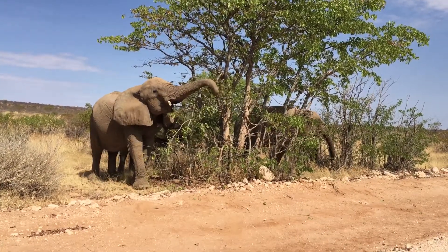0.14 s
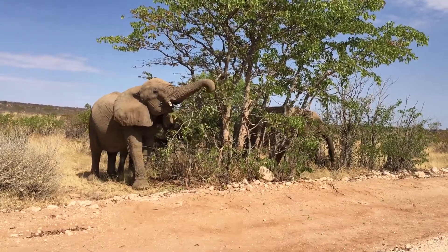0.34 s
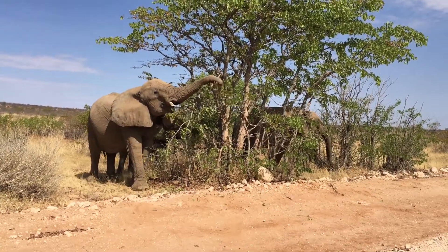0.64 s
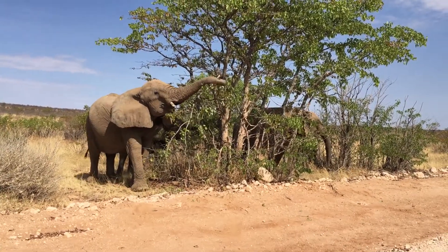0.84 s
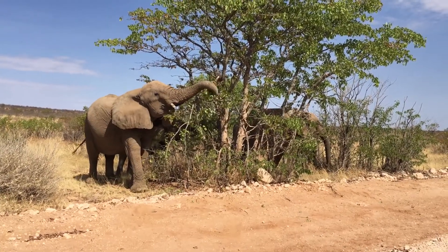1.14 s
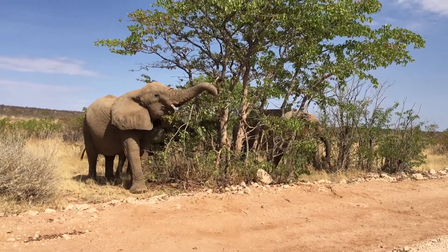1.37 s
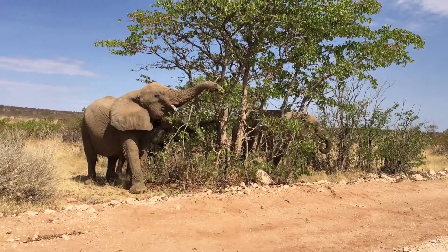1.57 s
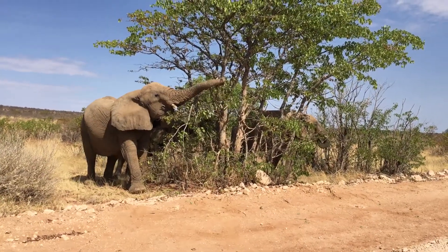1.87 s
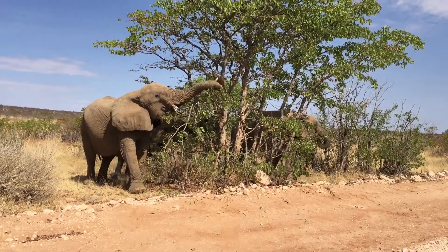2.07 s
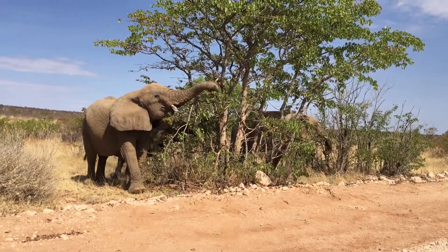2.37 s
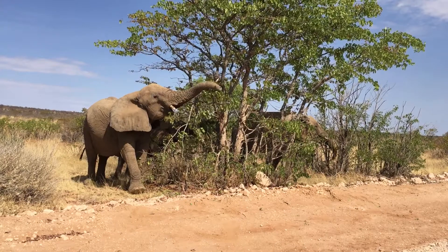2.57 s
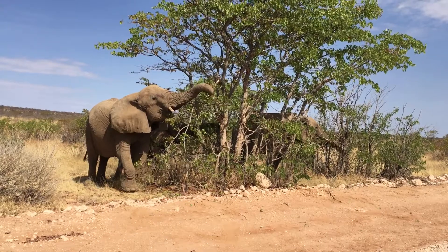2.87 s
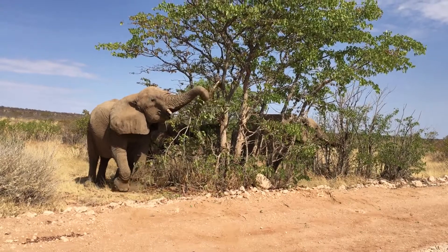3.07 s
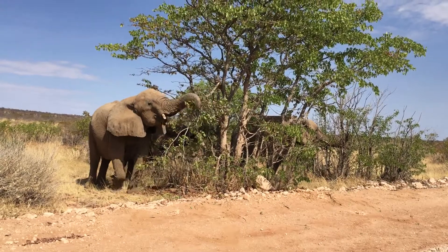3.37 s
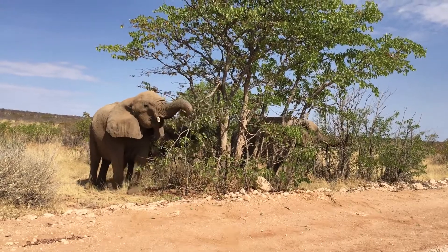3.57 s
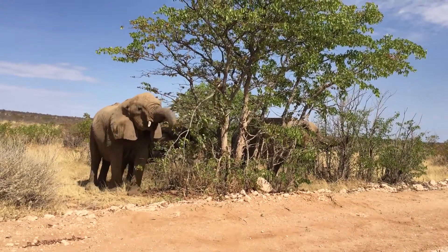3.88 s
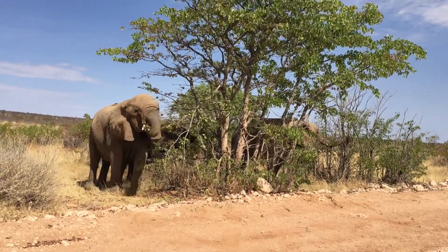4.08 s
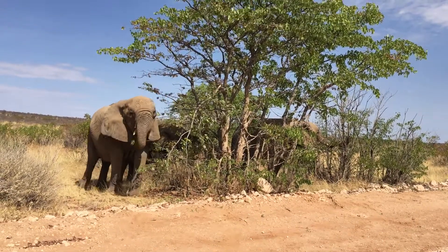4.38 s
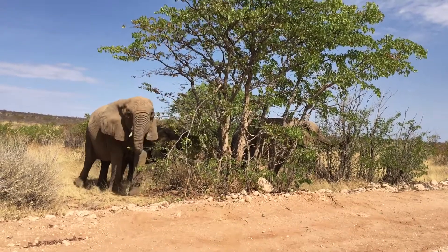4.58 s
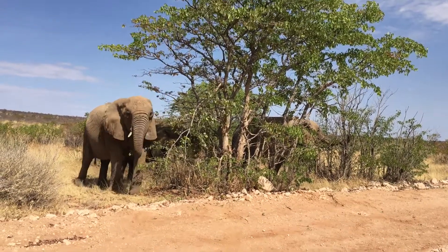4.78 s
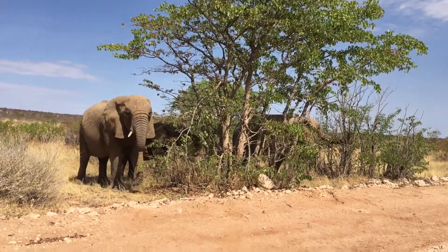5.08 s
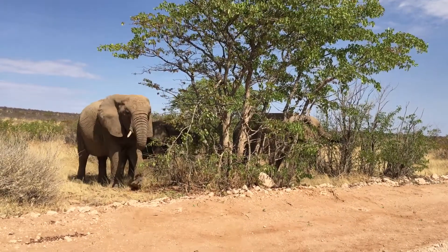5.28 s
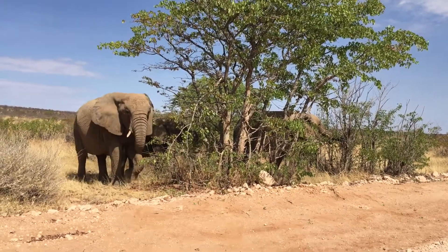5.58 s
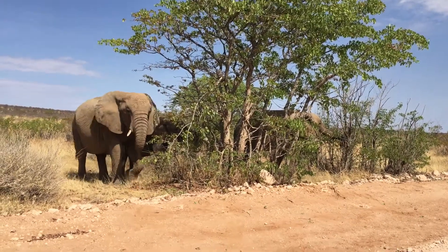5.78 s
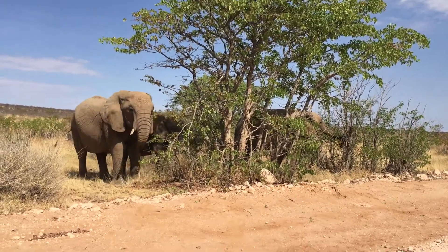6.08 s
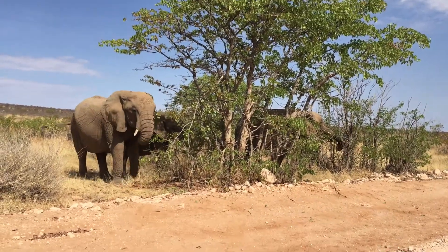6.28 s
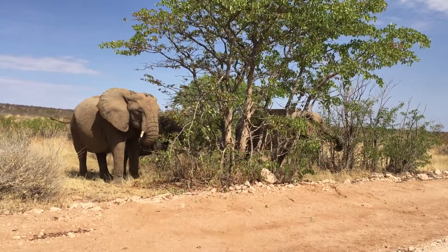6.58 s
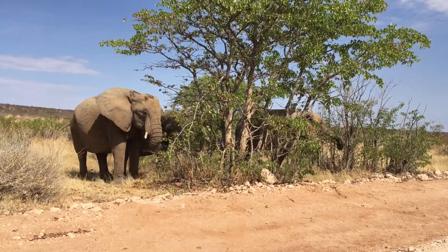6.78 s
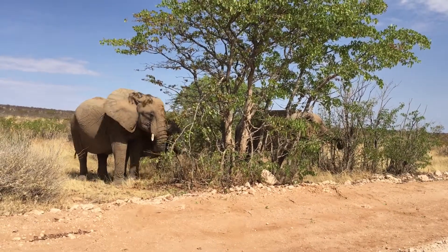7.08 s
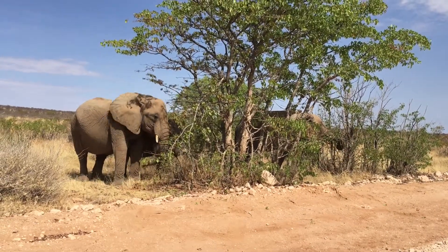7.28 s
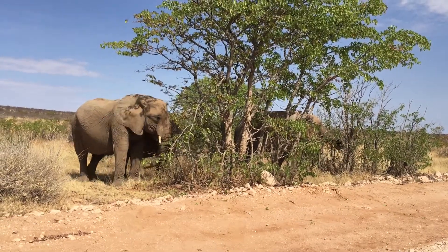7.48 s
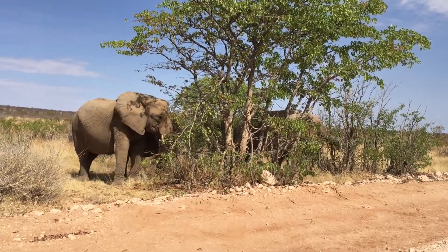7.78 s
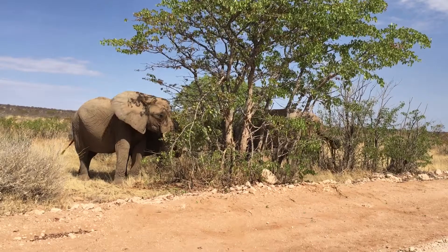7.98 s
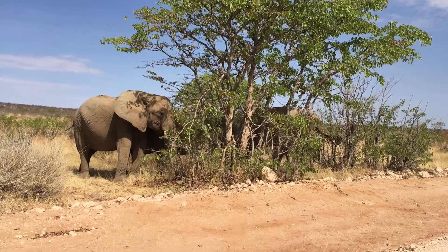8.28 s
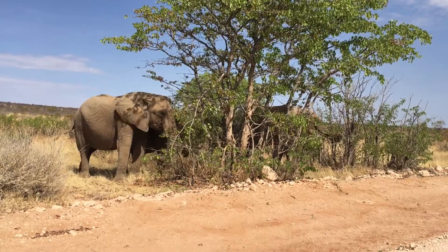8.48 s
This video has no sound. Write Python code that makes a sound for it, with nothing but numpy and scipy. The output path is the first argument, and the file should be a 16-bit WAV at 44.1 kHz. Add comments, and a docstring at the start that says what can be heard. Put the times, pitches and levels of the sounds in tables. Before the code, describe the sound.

Outdoors in dry bushland, cicadas buzz constantly in a bright, rapidly pulsing high drone. An elephant several metres away pulls at a bush: sharp twig snaps at the start, a quieter gap, a strong crack and crunching near three seconds, then scattered ticks and renewed leaf rustle. Dull soft thuds of feet and boughs. A deep steady motor hum sits close to the microphone, with faint low wind. Mono.

```python
"""Twigs snap and dry leaves rustle as an elephant tugs at a bush across a dirt track; heavy feet shift.
Snaps are noise bursts ringing resonators, the rustle is dense random ticks, the knocks are resonant noise.
Cicadas drone all around: click trains pulsed by muscle beats, over a hiss of distant singers.
A machine hums steadily close to the microphone as a sum of sines, over soft low gusts and still air.
Mono, the same in both channels."""
import sys
import numpy as np
from scipy import signal
from scipy.fft import rfft, irfft
from scipy.io import wavfile
from scipy.ndimage import uniform_filter1d

SR = 44100
rng = np.random.default_rng(int(sys.argv[2]) if len(sys.argv) > 2 else 0)


def generate_wav(signal):
    """Clip the signal to [-1, 1] and save it as 16-bit WAV at the path in sys.argv[1]."""
    frames = np.transpose(np.atleast_2d(signal))
    scaled = np.clip(frames, -1, 1) * 32767
    pcm = np.round(scaled).astype(np.int16)
    wavfile.write(sys.argv[1], SR, pcm)


N = 381024


def undb(db):
    """Amplitude ratio of a level in dB."""
    return 10 ** (np.asarray(db) / 20)


def level(x, db):
    """Scales x to an RMS level in dB."""
    return x * undb(db) / np.sqrt(np.mean(x ** 2))


def curves(table):
    """Columns of a (t/s, value, ..) table, interpolated to one value a sample."""
    t_s, *columns = np.transpose(table)
    return [np.interp(np.arange(N) / SR, t_s, column) for column in columns]


def colour(x, points):
    """Filters x by (f/Hz, gain/dB) points, falling 40 dB beyond each end."""
    hz, db = np.transpose(points)
    f_hz = np.fft.rfftfreq(len(x), 1 / SR) + 1  # +1 keeps the log finite
    log_edges = np.log(np.r_[hz[0] / 1.5, hz, hz[-1] * 1.5])
    gain_db = np.interp(np.log(f_hz), log_edges, np.r_[db[0] - 40, db, db[-1] - 40])
    return irfft(rfft(x) * undb(gain_db), len(x))


def band(x, hz, width_share):
    """One resonance; bandwidth as a share of its frequency."""
    b, a = signal.iirpeak(np.clip(hz, 50, .4 * SR), 1 / width_share, SR)
    return signal.lfilter(b, a, x)


def band_twice(x, hz, width_share):
    """Two equal resonances in series, for steeper skirts."""
    return band(band(x, hz, width_share), hz, width_share)


def walk(rate_hz):
    """Random levels held 1 / rate_hz s and slewed twice; RMS 1."""
    hold = int(SR / rate_hz)
    steps = np.repeat(rng.standard_normal(N // hold + 1), hold)
    return level(uniform_filter1d(uniform_filter1d(steps, hold), hold)[:N], 0)


def scatter(x, t60_s, wet_db):
    """Echoes from leaves, trunks and ground: a decaying noise tail after the direct sound."""
    t = np.arange(SR // 2) / SR
    tail = rng.standard_normal(len(t)) * undb(-60 * t / t60_s)
    tail *= undb(wet_db) / np.sqrt(np.sum(tail ** 2))
    tail[0] = 1  # direct sound
    return signal.fftconvolve(x, tail)[:N]


# Breaking twigs: t/s, ring peak level/dB, ring f/Hz, broad crack re ring/dB, treble re ring/dB
TWIG_BREAKS = [(0.304, -39, 5300, 1, 4), (0.413, -28.5, 4720, -1, -15), (0.671, -33.5, 3560, 6.5, 3),
               (0.745, -44, 3550, -16, -16), (0.88, -44.5, 2700, 4, 8), (0.907, -34, 5440, 4.5, 4),
               (1.349, -43.5, 1120, 2, -10), (1.382, -47, 3420, -8, -7), (1.448, -39, 4100, -8, -4),
               (1.516, -47.5, 2250, -8, -8), (1.569, -47, 765, -15, -21), (2.209, -43, 4570, 1, -15),
               (2.504, -45, 3770, 5, -13), (3.171, -41, 2190, -8, -14), (3.214, -27.5, 4280, -14, -17),
               (3.219, -28.5, 1620, 0, -19), (3.268, -34, 2640, 8, -4), (3.399, -44.5, 3300, -6, -9),
               (3.729, -42, 662, -6, -18), (3.75, -35.5, 2220, -8, -25), (3.769, -40.5, 700, -1, -22),
               (3.789, -37, 2370, -6, -22), (3.926, -38, 4220, -10, -18), (4.167, -39.5, 2450, 14, -3),
               (4.392, -43, 3480, -8, -13), (4.981, -40, 2700, 10, -13), (5.271, -44.5, 790, -8, -14),
               (5.58, -39, 4200, -10, -10), (5.699, -46, 1410, 12, -11), (6.055, -42.5, 1900, -10, -12),
               (6.126, -43, 3680, -8, -14), (6.357, -48, 1290, 1, -14), (6.385, -43, 4480, -8, -13),
               (6.435, -44, 3610, -8, -13), (6.549, -44, 3780, -14, -15), (6.66, -43.5, 1890, -10, -13),
               (6.687, -41, 4460, -8, -16), (6.823, -38, 4130, 3, -24), (7.126, -45, 1960, -8, -14),
               (7.222, -41.5, 1950, -6, -16), (7.334, -41.5, 1780, -8, -19), (7.465, -37, 2220, -8, -18),
               (7.672, -48.5, 1270, 15, -9), (7.787, -46, 3470, -8, -13), (8.074, -41, 5310, -6, -12),
               (8.126, -40, 1920, -8, -19), (8.139, -43, 5380, -5, -11), (8.321, -45.5, 1980, 14, -6),
               (8.371, -45, 2500, -8, -12)]
BREAK_T60_MS, BREAK_BODY_DB = 36, -18.5
# Faint twigs at chance moments; spread is the range above FAINT_DB
FAINT_COUNT, FAINT_DB, FAINT_SPREAD_DB = 30, -55, 7
FAINT_LOW_HZ, FAINT_HIGH_HZ, FAINT_CRACK_DB, FAINT_TREBLE_DB = 1200, 4500, -5, -11


def faint_breaks():
    """Chance twigs as rows of the break table; thinner twigs ring higher."""
    rows = []
    for when, size, thin in rng.random((FAINT_COUNT, 3)):
        ring_hz = FAINT_LOW_HZ * (FAINT_HIGH_HZ / FAINT_LOW_HZ) ** thin
        peak_db = FAINT_DB + FAINT_SPREAD_DB * size
        rows.append((when * N / SR, peak_db, ring_hz, FAINT_CRACK_DB, FAINT_TREBLE_DB))
    return rows


def snaps():
    """A break is an uneven dying splinter burst that rings the twig; fibres crackle on in a slower tail."""
    out, t = np.zeros(N + SR), np.arange(SR // 5) / SR
    fall_db = -60 * 1000 * t / BREAK_T60_MS
    decay = undb(fall_db) + undb(-17.5 + fall_db / 4)
    for t_s, peak_db, hz, crack_db, treble_db in list(TWIG_BREAKS) + faint_breaks():
        crack, splinter = rng.standard_normal((2, len(t)))
        uneven = undb(3 * uniform_filter1d(splinter, 30) * np.sqrt(30))
        onset = 1.5 * np.exp(-t / .0008)
        burst = crack * (uneven + onset) * decay
        ring = band_twice(burst, hz, .5)
        broad = band(burst, 4500, 1.7)
        treble = band_twice(burst, 10600, 0.48)
        body = band_twice(burst, 340, 1.0)
        parts = (ring, 0), (broad, crack_db), (treble, treble_db), (body, BREAK_BODY_DB)
        i = int(t_s * SR)
        for part, db in parts:
            out[i:i + len(t)] += undb(peak_db + db) * part / np.abs(part).max()
    return out[:N]


# Crushed handfuls of leaves: t/s, length/s, level/dB
CRUSHED_HANDFULS = [(.42, 0.013, -58), (0.672, 0.023, -54.5), (.915, 0.054, -61), (1.322, 0.089, -60),
                    (3.17, .11, -51.5), (3.561, 0.047, -51), (3.712, 0.083, -46), (3.917, .05, -55),
                    (4.18, .02, -53), (4.353, .07, -59.5), (4.99, .03, -64), (5.583, 0.015, -55.5),
                    (6.826, .03, -52), (7.225, .04, -58), (7.33, .02, -53), (7.47, 0.022, -49),
                    (8.128, 0.036, -55.5)]
CRUSH_ATTACK_S, CRUSH_RELEASE_S = 0.012, 0.022


def crushing():
    """Amplitude of the crushed handfuls: attack, hold, release."""
    t = np.arange(N) / SR
    strength = 0
    for t_s, length_s, db in CRUSHED_HANDFULS:
        end_s = t_s + length_s
        corners_s = [t_s - CRUSH_ATTACK_S, t_s, end_s, end_s + CRUSH_RELEASE_S]
        strength = strength + undb(db) * np.interp(t, corners_s, [0, 1, 1, 0])
    return strength


# Steady pull on the branches: t/s, leaf level/dB, woody body re leaves/dB, gain around 9 kHz/dB
BRANCH_DRAG = [(0, -61, -4, -6), (.45, -69.5, -6, 0), (.9, -62.5, -7, 7.5), (1.75, -67.5, -5, -8),
               (2.2, -55, -12, -7), (2.6, -67.5, -9, 7), (2.95, -62, -8, -1), (3.45, -57.5, -8, 3.5),
               (4.0, -53, -8.5, 1.5), (4.6, -62.5, -13, 6.5), (5.1, -66.5, -6, 6), (5.3, -57, -6.5, 0),
               (5.83, -67, -9, 8.5), (5.9, -59, -9.5, 4), (6.6, -58.5, -11, -4), (6.85, -54.5, -12, -12),
               (7.35, -51, -15.5, -8), (7.75, -56, -10.5, -3), (7.86, -69, -8, 0), (8.03, -66, -10, 2),
               (8.07, -61.5, -7.5, 7), (8.64, -62.5, -5, 4)]
# Colour of the leaves: f/Hz, gain/dB
LEAF_COLOUR = [(800, -12.5), (1300, -9), (1650, -3.5), (2400, -2.5), (2900, -8.5), (3500, -2), (4100, -5),
               (4900, -10), (5800, -4), (9000, -14.5), (16000, -16.5)]


def rustle():
    """Dense tiny ticks of uneven size excite leaf resonances; wood adds body, a treble band brightness."""
    drag_db, body_db, bright_db = curves(BRANCH_DRAG)
    when, size, sign = rng.random((N, 3)).T
    tick_size = undb(-1.8 * np.log(1 - size))
    ticks = (when < .2) * (sign - .5) * tick_size * undb(.8 * walk(80))
    # leaves of each size crinkle in their own short spells
    sizes = 0
    for hz in 700 * 1.3 ** np.arange(13):
        spells = undb(1.9 * walk(110) + 1.8 * walk(25))
        sizes = sizes + spells * band(ticks, hz, .3)
    leaves = level(colour(sizes, LEAF_COLOUR), 0)
    wood = level(undb(1.9 * walk(50)) * band(band(ticks, 535, 1.6), 694, 2.2), 0)
    crisp = band(leaves, 9000, 0.74)
    strength = np.hypot(undb(drag_db), crushing())
    return strength * (leaves + undb(body_db) * wood + (undb(bright_db) - 1) * crisp)


# Dull knocks of feet and boughs: t/s, peak level/dB, f/Hz, length/ms
FOOT_KNOCKS = [(1.349, -45.5, 171, 72), (1.88, -52, 75, 70), (2.511, -44.5, 159, 46),
               (3.76, -46.5, 120, 68), (3.96, -54, 100, 86), (4.93, -50.5, 148, 55), (5.679, -59, 110, 46),
               (5.991, -49, 95, 60), (6.08, -50, 127, 53), (6.541, -52, 280, 50), (7.35, -42.5, 111, 87),
               (7.46, -46, 150, 47), (8.55, -40, 130, 69)]


def knocks():
    """Rough resonant noise that swells and fades within a few cycles."""
    out = np.zeros(N)
    for t_s, peak_db, hz, length_ms in FOOT_KNOCKS:
        i, n = int(t_s * SR), int(length_ms * SR / 1000)
        settled = band_twice(rng.standard_normal(SR // 2), hz, 0.32)[-n:]
        shake = settled * np.hanning(n) ** 0.41
        out[i:i + n] += (undb(peak_db) * shake / np.abs(shake).max())[:N - i]
    return out


# Single cicadas: rib click f/Hz, muscle beat f/Hz, relative level/dB, unsteadiness/share of click f
CICADA_SINGERS = [(768.5, 57.6, 0, 0.007), (714.5, 54, -3, .009), (769.8, 57, -5.5, .008),
                  (737, 83, -7.5, .007), (654.7, 56, -12, .01)]
# Cicada body colour: f/Hz, gain/dB
CICADA_COLOUR = [(5500, -33.5), (5950, -28.5), (6150, -22), (6490, -18.5), (6920, -8.5), (7290, -2.5),
                 (7560, -1.5), (7850, 1), (8700, -1), (9300, -10.5), (9670, -14.5), (9980, -20.5),
                 (10200, -20), (10450, -29.5), (11600, -27.5), (13000, -32.5)]
# Whole chorus: t/s, level/dB
CHORUS_LEVEL = [(0, -35.5), (1.2, -35), (2.1, -35), (2.6, -35.5), (3.3, -36), (4.86, -34.5), (7.4, -35),
                (8.64, -35)]


def cicadas():
    """Ribs buckle in quick click trains, once each muscle beat; many distant singers blur to a hiss."""
    near = 0
    for click_hz, beat_hz, db, unsteady in CICADA_SINGERS:
        drift = unsteady * walk(300) + .003 * walk(1.2)
        phase = 2 * np.pi * (rng.random() + np.cumsum(click_hz * (1 + drift)) / SR)
        clicks = sum(np.cos(k * phase) for k in range(7, 19))
        beat = 2 * np.pi * (rng.random() + np.cumsum(beat_hz * (1 + .015 * walk(6))) / SR)
        pulse_db = 3.3 * np.cos(beat) + 1.2 * walk(1.45)
        near = near + level(scatter(clicks * undb(pulse_db), 0.042, -1.9), db)
    song = level(near, 0) + level(rng.standard_normal(N), -0.43)
    return level(colour(song, CICADA_COLOUR), 0) * undb(curves(CHORUS_LEVEL)[0])


# Motor overtones: multiple of HUM_HZ, level re HUM_DB/dB
HUM_OVERTONES = [(1, 0.5), (2, -23), (4, -28), (5, -28.5), (6, -21.5), (7, -35.5), (8, -41.5), (10, -37),
                 (12, -46)]
HUM_HZ, HUM_DB = 48.247, -45.5


def hum():
    """A motor tone of steady pitch with overtones; higher ones waver slightly more in level."""
    phase = 2 * np.pi * HUM_HZ * np.arange(N) / SR
    out = 0
    for k, db in HUM_OVERTONES:
        waver_db = (0.96 + 0.11 * k) * walk(3.04)
        tone = np.sqrt(2) * np.sin(k * phase + 2 * np.pi * rng.random())
        out = out + undb(HUM_DB + db + waver_db) * tone
    return out


# Gust colour: f/Hz, gain/dB
GUST_COLOUR = [(35, -21), (60, -10.5), (80, -9.5), (161, -8.5), (258, -16), (289, -20.5), (420, -32.5),
               (550, -65), (920, -120)]
WIND_DB, GUST_DB, GUSTS_PER_S = -61.5, 1.5, 5


def gusts():
    """Soft low wind on the microphone: low-pitched noise of wandering level."""
    rough = rng.standard_normal(N) * undb(1.8 * walk(20))
    return level(colour(rough, GUST_COLOUR), 0) * undb(WIND_DB + GUST_DB * walk(GUSTS_PER_S))


# Still air colour: f/Hz, gain/dB
AIR_COLOUR = [(25, -3), (60, 6), (300, -7), (500, -13.5), (1200, -14), (2200, -16.5), (3000, -21.5),
              (3700, -15), (5000, -27), (11000, -13.5), (16000, -13.5)]
AIR_DB = -60


def still_air():
    """Steady coloured noise."""
    return level(colour(rng.standard_normal(N), AIR_COLOUR), AIR_DB)


def scene():
    """Bush, feet, insects, motor, wind and still air, the same in both channels."""
    bush = scatter(snaps() + rustle(), 0.15, -15)
    mono = bush + knocks() + cicadas() + hum() + gusts() + still_air()
    return np.tile(mono, (2, 1))


TOP_HZ = 15750


def record(dry):
    """The recorder cuts the top with a steep low-pass."""
    return signal.sosfilt(signal.ellip(12, .2, 80, TOP_HZ, fs=SR, output="sos"), dry)


dry = scene()
out = record(dry)
generate_wav(out)
```